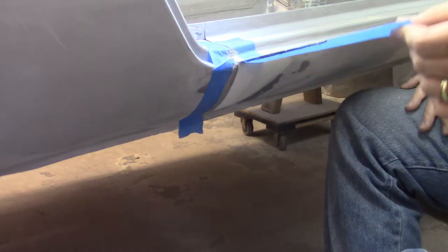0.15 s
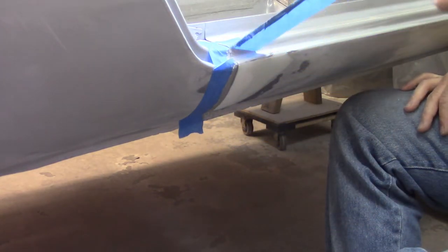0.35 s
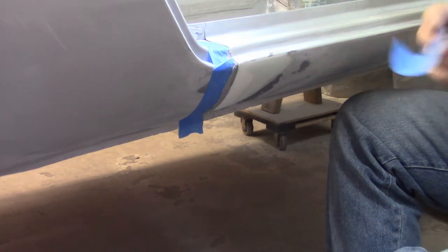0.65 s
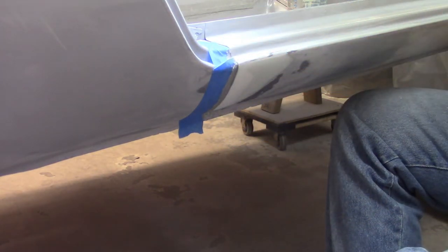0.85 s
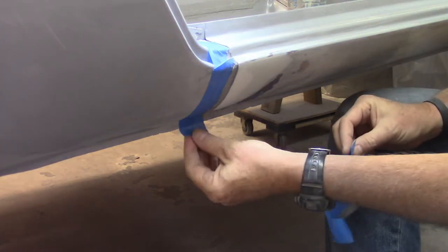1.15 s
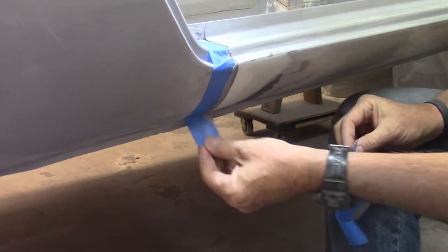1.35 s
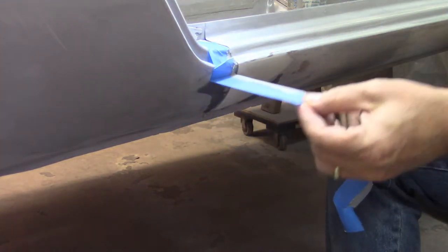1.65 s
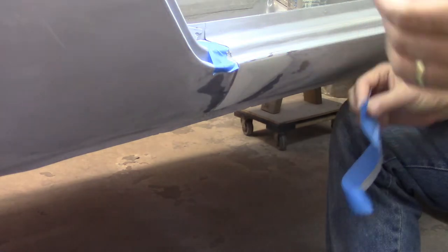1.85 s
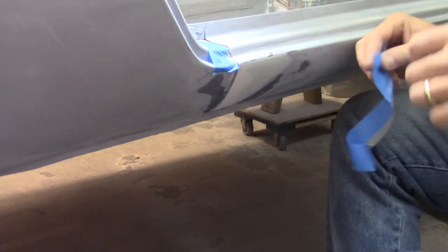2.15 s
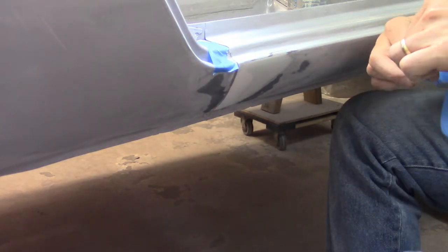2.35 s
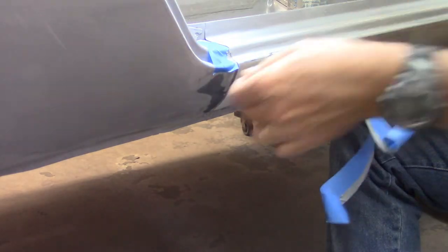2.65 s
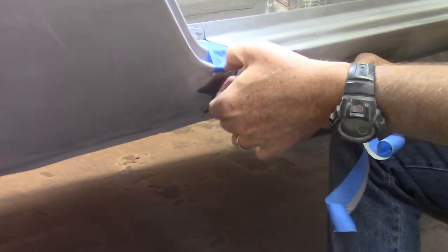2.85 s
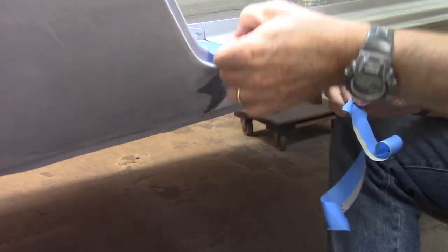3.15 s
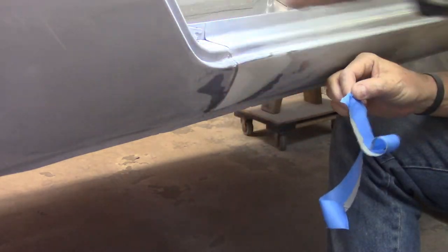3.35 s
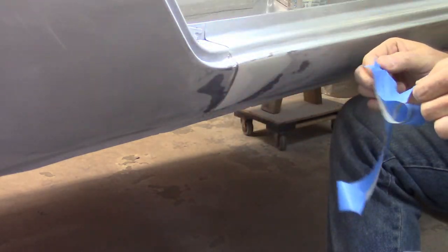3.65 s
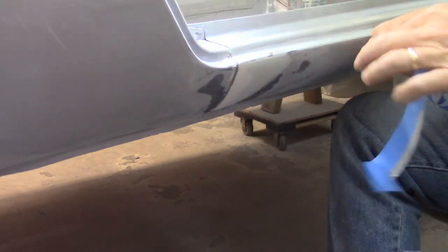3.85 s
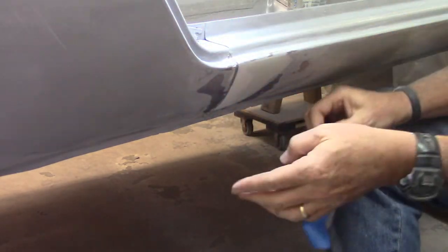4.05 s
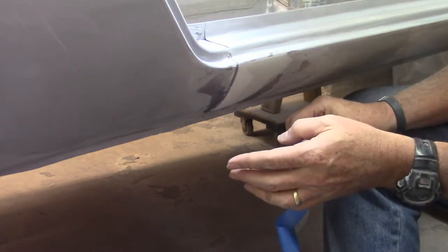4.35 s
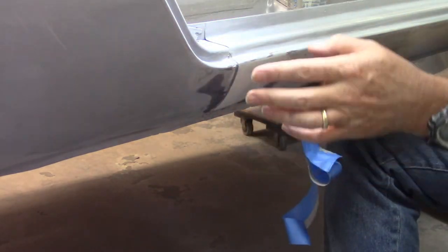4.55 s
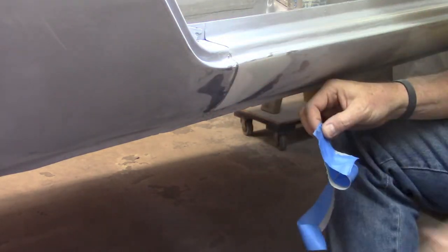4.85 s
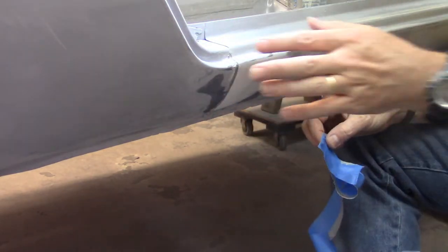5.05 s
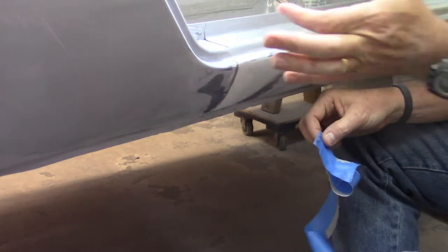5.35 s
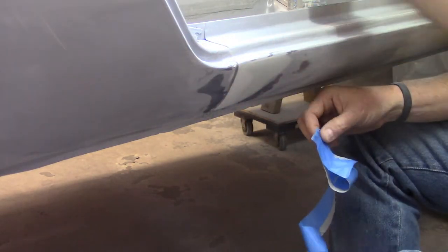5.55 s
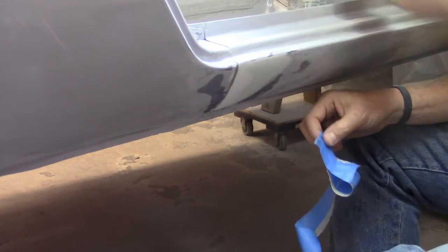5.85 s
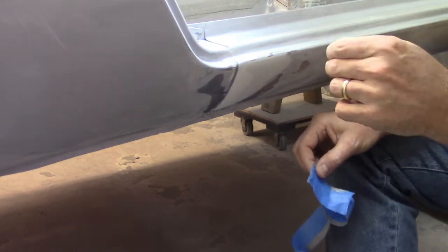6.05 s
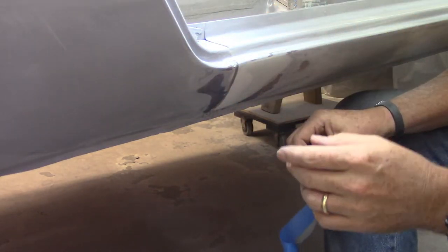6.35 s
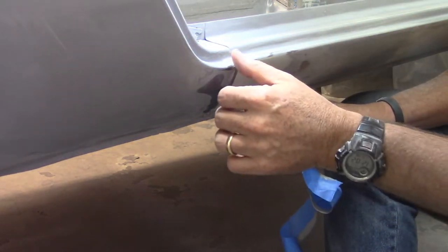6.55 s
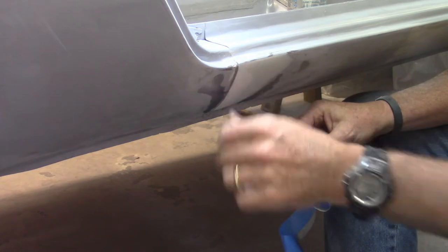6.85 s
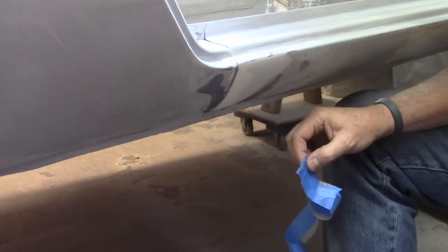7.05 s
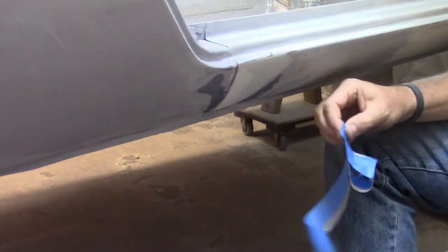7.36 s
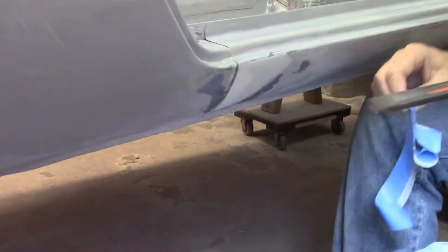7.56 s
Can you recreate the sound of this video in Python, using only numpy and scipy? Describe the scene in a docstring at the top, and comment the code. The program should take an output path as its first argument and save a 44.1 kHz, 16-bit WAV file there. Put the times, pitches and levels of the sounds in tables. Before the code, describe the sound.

A workshop fan roars and hums steadily while masking tape is peeled close by, with fine crackles and sharp, bright crinkling snaps.

```python
"""A fan roars and hums steadily in a workshop: its roar is noise shaped by resonances, its hum a
set of sines. This background level creeps up a little, quickly at first. Close by, masking tape is
peeled off a car's sill as a fine crackle of tiny clicks. The loose strip crinkles and snaps in
sharp, ringing bursts. A few harder double taps and a brief rustle of clothes come from the worker.
Both channels are alike."""
import sys
import numpy as np
from scipy import signal
from scipy.fft import rfft, irfft
from scipy.io import wavfile

SR = 44100
rng = np.random.default_rng(int(sys.argv[2]) if len(sys.argv) > 2 else 0)


def digitize_waveform(pressure):
    """Quantize a signal to 16-bit integers and store it at the path in sys.argv[1].

    Rows of a 2-D input are taken as channels; values are limited to [-1, 1].
    """
    field = np.atleast_2d(pressure).T
    bounded = np.clip(field, -1, 1)
    quanta = np.round(bounded * 32767).astype(np.int16)
    wavfile.write(sys.argv[1], SR, quanta)


N = 339680  # length in samples


def gain_of(db):
    """Turns decibels into a factor."""
    return 10 ** (np.asarray(db) / 20)


def evened(x):
    """Scales a sound to rms 1."""
    return x / np.sqrt(np.mean(x ** 2) + 1e-20)


def read(points, hz):
    """Reads a spectrum's dB at hz, with straight lines between points on a log-frequency axis."""
    f, db = np.transpose(points)
    return np.interp(np.log(hz + 1), np.log(f + 1), db)


def bump(hz, centre_hz, width_hz):
    """Bell shape of a resonance, height 1; the width is two standard deviations."""
    return np.exp(-2 * ((hz - centre_hz) / width_hz) ** 2)


def add(mix, s, sound):
    """Mixes a sound in at time s (seconds)."""
    part = mix[max(round(s * SR), 0):][:len(sound)]
    part += sound[:len(part)]


def coloured(x, points):
    """Filters x by a spectrum and scales it to rms 1."""
    hz = np.fft.rfftfreq(len(x), 1 / SR)
    spectrum = rfft(x) * gain_of(read(points, hz))
    return evened(irfft(spectrum, len(x)))


def drift(rate_hz):
    """Slow random motion, mostly below rate_hz, rms 1."""
    hz = np.fft.rfftfreq(N, 1 / SR)
    spectrum = rfft(rng.standard_normal(N)) / (1 + (hz / rate_hz) ** 4)
    return evened(irfft(spectrum, N))


def grains(per_s, spread_db):
    """Tiny clicks at random times, rms 1; a larger spread makes their sizes less equal."""
    size = gain_of(spread_db * np.minimum(rng.exponential(1, N), 4))
    sign = rng.choice([-1, 1], N)
    present = rng.random(N) < per_s / SR
    return evened(size * sign * present)


def fan_air(flutter_db=0.48):
    """Rushing, turbulent air coloured by the housing, with a finely uneven spectrum."""
    # air rushing through the fan, relative spectrum: f/Hz, level/dB (per Hz)
    roar = [(30, -33), (150, -31.5), (240, -25), (320, -17.5), (420, -13.5), (600, -13.5), (800, 0.0),
            (1500, -3.5), (2450, -1.34), (2750, -6.5), (4500, -11.5), (6000, -16.0), (10000, -18),
            (12000, -22), (15500, -24.5)]
    # resonances of the fan's housing and its surroundings: f/Hz, width/Hz, rise/dB
    housing = [(347, 25, 11.2), (418, 43, 5.1), (564, 96, 8.0), (652, 31, 9.9), (712, 59, 11.0),
               (920, 44, 9.9), (975, 59, 8.0), (1102, 29, 4.1), (1189, 27, 10.2), (1232, 20, 8.9),
               (1325, 29, 5.6), (1395, 48, 7.1), (1548, 125, 11.0), (1730, 56, 4.1), (1826, 47, 5.7),
               (2066, 38, 4.6), (2135, 34, 3.0), (2262, 26, 6.9), (2337, 56, 6.0), (2469, 96, 4.3),
               (3136, 25, 4.2), (3448, 40, 4.2), (3836, 44, 3.6), (4356, 110, 4.2), (5100, 217, 2.0),
               (7580, 205, 1.4), (9614, 108, 5.0)]
    roar_db = -40.5  # rms before the flutter and the background rise
    hz = np.fft.rfftfreq(N, 1 / SR)
    db = read(roar, hz) + sum(rise * bump(hz, f, width) for f, width, rise in housing)
    # fine random unevenness of the spectrum, stronger in the treble
    unevenness = evened(np.convolve(rng.standard_normal(len(hz)), np.hanning(280), "same"))
    db = db + unevenness * np.interp(hz, [1200, 3000], [.4, 1.4])
    air = evened(irfft(rfft(rng.standard_normal(N)) * gain_of(db), N))
    flutter = gain_of(flutter_db * drift(17))
    return gain_of(roar_db) * air * flutter


def tone(hz, db, flutter):
    """A sine on a pitch curve; moving air makes its strength flutter."""
    turns = np.cumsum(hz) / SR + rng.random()  # random starting phase
    strength = 1 + flutter * drift(8.6)
    return gain_of(db) * evened(strength * np.sin(2 * np.pi * turns))


def fan_hum():
    """Motor tones share one slightly unsteady speed; the magnetic hum is locked to the mains."""
    # levels in these three tables are rms before the background rise
    # tones of the turning motor: multiple of the shaft frequency, level/dB
    motor_tones = [(2, -79.5), (4, -65.5), (6, -60), (12, -67), (22, -63), (24, -60), (28, -67),
                   (30, -68.5), (32, -71), (34, -69.5), (42, -72.5), (44, -67)]
    # magnetic hum: multiple of the mains hum frequency, level/dB
    mains_tones = [(4, -64.5), (8, -50.5), (12, -61.5), (24, -83)]
    # further steady tones of the machine: f/Hz, level/dB, waver/Hz (rms)
    whine_tones = [(353.9, -60.3, .15), (2123, -60.5, 1.6), (3558, -67, 1.2)]
    mains_hz = 120
    shaft_hz = 117 + .02 * drift(0.98)
    motor = sum(tone(round(k) * shaft_hz, db, flutter=.25) for k, db in motor_tones)
    mains = sum(tone(np.full(N, round(k) * mains_hz), db, flutter=0.18) for k, db in mains_tones)
    whines = sum(tone(hz + waver * drift(2.15), db, flutter=0.04) for hz, db, waver in whine_tones)
    return motor + mains + whines


def background_rise():
    """The background level creeps up as a power of time, quickly at first: a gain per sample."""
    start_db, rise_db, power = -2.5, 1.11, 0.53  # level at the start, gain after one second, shape
    t = np.arange(N) / SR
    return gain_of(start_db + rise_db * t ** power)


def peeling():
    """Threads of glue break one by one, a fine crackle that swells with each pull."""
    # glue letting go, or fingers sliding on tape: t/s, length/s, level/dB
    peels = [(.235, .048, -54.5), (.292, .04, -55), (0.475, .085, -49.5), (1.092, .068, -51),
             (1.222, 0.2, -53.5), (1.64, .1, -58), (1.88, 0.12, -62), (3.07, .07, -55), (3.19, .09, -58),
             (6.88, .28, -58)]
    # relative spectrum of the crackle: f/Hz, level/dB (per Hz)
    peel_colour = [(100, -45), (500, -32), (2500, -2), (7000, 1.5), (13000, 0), (16000, -8)]
    pull = np.zeros(N)
    for s, length, db in peels:
        swell = signal.windows.tukey(max(round(length * SR), 2), .7)
        add(pull, s, gain_of(db) * swell)
    return pull * coloured(grains(per_s=2800, spread_db=3.5), peel_colour)


def snap(colour, ring_hz, ring_db, ring_width_hz, t60, crumple, size=4096):
    """A sharp release and its dying crumple, rung through a body; energy of 1 ms at rms 1."""
    t = np.arange(size) / SR
    hz = abs(np.fft.fftfreq(size, 1 / SR))
    after = rng.standard_normal(size) * gain_of(-60 * t / max(t60, .002))
    # a long crumple drowns the first release, which is the single click at t = 0
    drive = crumple * t60 * after / np.linalg.norm(after) + (t == 0)
    log_gain = np.log(gain_of(read(colour, hz) + ring_db * bump(hz, ring_hz, ring_width_hz)))
    # minimum phase: the body rings only after the blow
    body = np.fft.ifft(np.exp(np.conj(signal.hilbert(log_gain)))).real
    sound = signal.fftconvolve(drive, body[:size // 2])
    return sound * np.sqrt(SR / 1000) / np.linalg.norm(sound)


def crinkles(ring_width_hz=800):
    """Creases of stiff paper flip over; each rings the small facet beside it, whose size colours it."""
    # creases flipping over: t/s, level/dB, f/Hz of the facet's ring, ring rise/dB, crumple t60/s
    creases = [(0.8116, -26, 8450, 15, .018), (.888, -26, 13600, 12, 0.022), (.974, -36, 8020, 15, .075),
               (1.021, -35.5, 11600, 4, .06), (1.275, -34, 13000, 7, .03), (1.2805, -27, 6810, 8, .012),
               (2.357, -32, 10000, 8, .02), (2.4425, -38, 7610, 5, .03), (2.552, -37, 14900, 6, .008),
               (3.1095, -36, 13000, 3, .015), (3.1177, -30, 11200, 6, .025), (3.141, -26, 6800, 13, 0.016),
               (3.194, -29.5, 10700, 7, 0.044), (3.211, -32, 7000, 9, .05), (3.2523, -34.5, 6260, 2, .03),
               (3.7324, -33.5, 13400, 6, .01), (5.6243, -25.5, 13650, 9, 0.063), (5.634, -34, 3800, 8, .05),
               (5.977, -33, 11650, 11, 0.046), (7.379, -37, 15300, 8, .035), (7.54, -37, 12600, 3, .03),
               (7.6765, -34, 7840, 7, .018)]
    # a smaller facet rings higher and sounds thinner; body and air levels hold at facet_hz
    facet_hz = 10000
    facet_body_db, body_db_per_octave = -1.5, -7  # around 3.5 kHz
    facet_air_db, air_db_per_octave = -0.5, 1  # above 11 kHz
    out = np.zeros(N)
    for s, db, ring_hz, ring_db, t60 in creases:
        octaves = np.log2(ring_hz / facet_hz)
        body_db = facet_body_db + body_db_per_octave * octaves
        air_db = facet_air_db + air_db_per_octave * octaves
        colour = [(60, -55), (300, -28), (1500, body_db - 11), (3500, body_db),
                  (7000, -1.5), (10000, 1.5), (13500, air_db)]
        add(out, s, gain_of(db) * snap(colour, ring_hz, ring_db, ring_width_hz, t60, crumple=90))
    return out


def clothes_rub():
    """Clothes rustle as the worker shifts: equal clicks build to one peak and stop quickly."""
    # relative spectrum of the rustle: f/Hz, level/dB (per Hz)
    shift_colour = [(60, -45), (250, -25), (700, 4), (2500, 1), (5000, -3.5), (10000, -5), (16000, -17)]
    peak_s, peak_db = 7.675, -42.5
    rise_db_per_s, fall_db_per_s = 57, 400
    late_s = np.arange(N) / SR - peak_s
    rub = gain_of(peak_db + np.minimum(rise_db_per_s * late_s, -fall_db_per_s * late_s))
    return rub * coloured(grains(per_s=4000, spread_db=0.0), shift_colour)


def double_taps():
    """Dull, hard taps of hand and foot; each lands a second time, softer and longer."""
    # first landings: t/s, level/dB, f/Hz of the ring, ring width/Hz, t60/s
    hits = [(1.1346, -28, 3900, 3500, 0.01), (7.29, -29.5, 4670, 500, .06),
            (7.6128, -29.5, 3300, 3200, .045), (7.6685, -19, 2050, 1100, 0.0046)]
    # relative spectrum of a tap: f/Hz, level/dB (per Hz)
    tap_colour = [(60, -52), (250, -27), (700, -4.5), (2300, -3), (3500, -6), (9000, -8), (16000, -22)]
    ring_db = 17
    landings = [(0, 0, 1), (.0018, -1, 2.4)]  # delay in s, level change in dB, t60 stretch
    out = np.zeros(N)
    for s, db, ring_hz, width_hz, t60 in hits:
        for delay_s, softer_db, stretch in landings:
            tap = snap(tap_colour, ring_hz, ring_db, width_hz, t60 * stretch, crumple=130)
            add(out, s + delay_s, gain_of(db + softer_db) * tap)
    return out


def workshop(x, t60=0.12, wet_db=-9, size=16384):
    """Adds short scattered echoes from the car's side and the floor."""
    t = np.arange(size) / SR
    present = (rng.random(size) < 3000 / SR) * (t > .003)  # about 3000 per second, after 3 ms
    echoes = rng.choice([-1, 1], size) * present * gain_of(-60 * t / t60)
    echoes = echoes / np.linalg.norm(echoes)
    return x + gain_of(wet_db) * signal.fftconvolve(x, echoes)[:N]


def scene():
    """Fan behind, hands in front, alike in both channels."""
    background = background_rise() * (fan_air() + fan_hum())
    worker = workshop(peeling() + crinkles() + clothes_rub() + double_taps())
    mono = background + worker
    return np.array([mono, mono])


def record(dry):
    """Cuts the highest treble with a steep low-pass filter."""
    edge_hz = 15850
    low_pass = signal.firwin(701, edge_hz, window=("kaiser", 7), fs=SR)
    return signal.oaconvolve(dry, low_pass[None], "same")


dry = scene()
out = record(dry)
digitize_waveform(out)
```